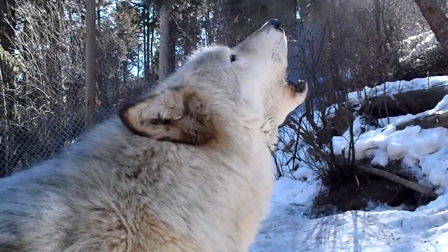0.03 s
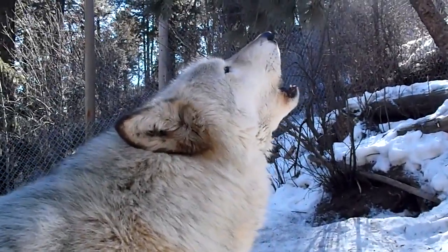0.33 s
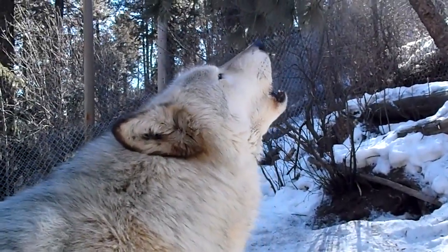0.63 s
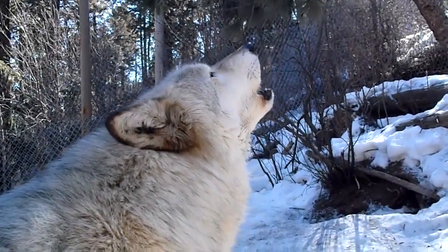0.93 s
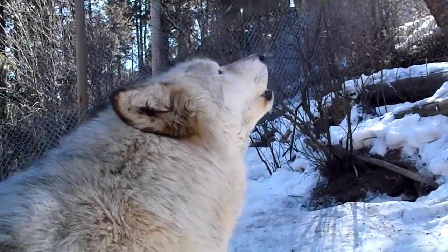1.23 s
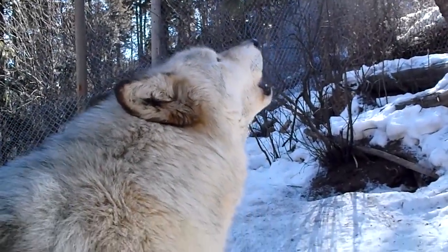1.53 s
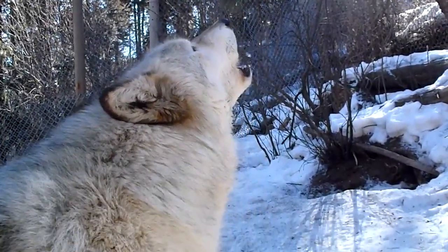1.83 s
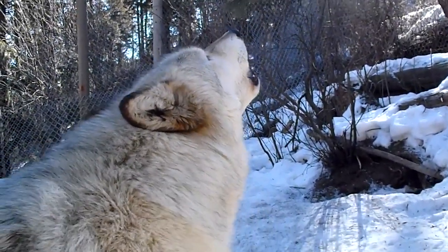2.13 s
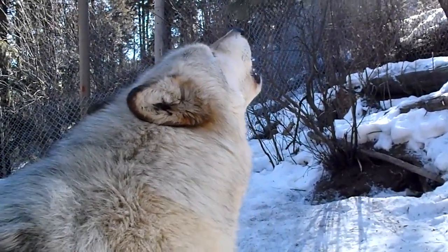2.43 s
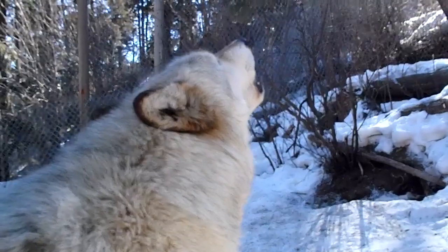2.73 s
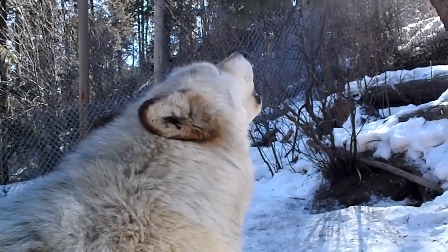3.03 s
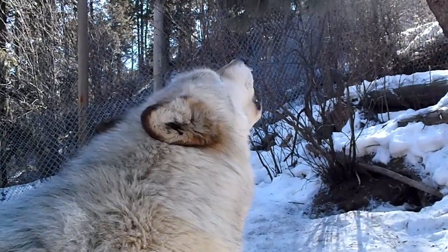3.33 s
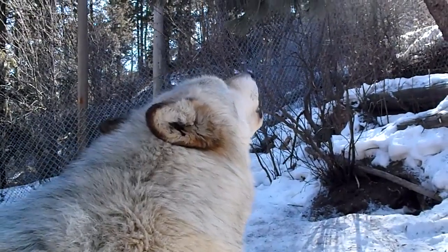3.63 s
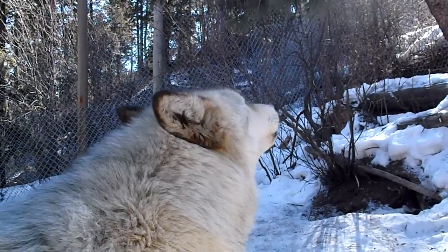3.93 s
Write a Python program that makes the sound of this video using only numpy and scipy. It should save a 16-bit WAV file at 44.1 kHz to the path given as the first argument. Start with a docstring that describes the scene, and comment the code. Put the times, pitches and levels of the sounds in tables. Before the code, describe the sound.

A wolf howls close to the microphone in a quiet wood. Its clear tone sinks, breaks lower, jumps back up and sinks again, briefly hoarse. Other wolves howl faintly far away, and light wind rumbles on the microphone.

```python
"""A wolf howls close by in a snowy wood, while other wolves answer far off and light wind rumbles
on the microphone. Its vocal folds start on a nearly pure tone that slowly sinks. At 1.2 s the voice
breaks down into a low register, with a few small ticks. At 2 s it breaks up again, then sinks as
the jaw closes, turning hoarse in places and ticking once more near the end."""
import sys
import numpy as np
from scipy import signal
from scipy.fft import rfft, irfft
from scipy.io import wavfile

SR = 44100
rng = np.random.default_rng(int(sys.argv[2]) if len(sys.argv) > 2 else 0)


def dump(signal):
    """Clip the signal to [-1, 1] and save it as 16-bit WAV at the path in sys.argv[1]."""
    limited = np.clip(np.atleast_2d(signal).T, -1, 1)
    pcm = np.round(limited * 32767).astype(np.int16)
    wavfile.write(sys.argv[1], SR, pcm)


N = 176400  # 4 seconds

# Small ticks, perhaps of the mouth: start_s, level_db
MOUTH_TICKS = [(1.232,-29),(1.548,-36),(1.571,-49.5),(1.596,-40),(1.616,-40.5),(1.827,-37.5),(3.462,-26)]


def wolf():
    """Vibrating vocal folds make the howl; hoarseness shakes its pitch and adds pulsing breath noise."""
    # The howl's three stretches: time_s, pitch_hz, first_harmonic_db, second_harmonic_db
    opening_tone = [(0.02, 698.6, -24, -22), (0.162, 677, -21, -31), (0.32, 662.5, -19.5, -29.5),
                    (0.486, 648, -18.5, -31), (0.516, 644.5, -21.5, -31.5), (0.53, 642.5, -17.5, -33),
                    (0.565, 626.3, -21.5, -26.5), (0.598, 620.4, -19, -23), (0.72, 591, -26, -19),
                    (0.796, 577.4, -26.5, -19.5), (0.942, 568.2, -28, -18.5), (1.002, 555.4, -32, -22),
                    (1.042, 545.3, -19, -21.5), (1.078, 541.7, -20.5, -27.5), (1.154, 519.5, -21.5, -24.5),
                    (1.184, 508.1, -17.5, -25), (1.208, 490.4, -19.5, -35)]
    low_tone = [(1.223, 443.7, -17, -25), (1.238, 435, -19.5, -29.5), (1.362, 419.6, -19, -28),
                (1.474, 429.3, -19.5, -27.5), (1.548, 482.4, -18.5, -35), (1.59, 497.3, -19.5, -41.5),
                (1.601, 499, -16.5, -42), (1.636, 503.4, -16.5, -42), (1.813, 491, -18, -46),
                (1.91, 487, -17, -40.5), (2.02, 485.6, -17.5, -36.5)]
    closing_tone = [(2.028, 608.4, -28, -27.5), (2.044, 608.5, -24.5, -35.5), (2.104, 604.3, -18.5, -30),
                    (2.158, 609.8, -18, -36.5), (2.39, 606.4, -18.5, -36.5), (2.658, 610.2, -21, -32.5),
                    (2.768, 604.2, -22.5, -22), (2.794, 597, -23.5, -18), (2.862, 570.6, -31, -17),
                    (2.978, 567.2, -33, -17), (3.18, 558, -26, -20.5), (3.219, 578.7, -33.5, -22),
                    (3.24, 573, -25.5, -20), (3.384, 581.2, -25, -28), (3.439, 566.2, -28, -19),
                    (3.466, 548, -22.5, -19), (3.545, 544.6, -23.5, -22.5), (3.626, 519.3, -20, -29),
                    (3.648, 504.7, -16, -38.5), (3.675, 496.5, -19, -40.5), (3.714, 501.5, -20, -29.5),
                    (3.756, 493.4, -24, -31.5), (3.877, 467.3, -24.5, -29), (3.933, 500, -32, -26.5),
                    (3.978, 527.3, -24, -32.5), (4.0, 518.6, -37, -26.5)]
    # Strength of harmonics 3 and 4 (three and four times the pitch): time_s, level_db
    third_levels = [(0,-34.5),(.2,-31.5),(.53,-34),(.73,-53),(.93,-54),(1.05,-42),(1.22,-35),(1.33,-25.5),(1.5,-35.5),(1.65,-53),(2.02,-47.5),(2.12,-35.5),(2.65,-37),(2.87,-54),(3.12,-55),(3.45,-50),(3.7,-36),(4,-51.5)]
    fourth_levels = [(0,-71),(.45,-52.5),(.68,-69.5),(.77,-45),(1.1,-43.5),(1.175,-24),(1.24,-41.5),(1.52,-42),(1.6,-38.5),(2.01,-35.5),(2.05,-56.5),(2.85,-47.5),(3.15,-70),(3.25,-51),(3.42,-54),(3.52,-99),(3.68,-42),(3.81,-54),(3.9,-37.5),(4,-68)]
    # Strength of the hoarse rasp and of air rushing past the folds: time_s, level_db
    rasp_levels = [(0,-46.5),(.48,-49),(.7,-49.5),(.95,-51.5),(1.1,-43),(1.27,-51.5),(1.48,-57.5),(1.55,-49.5),(1.65,-55.5),(2.01,-62),(2.08,-49.5),(2.75,-52),(2.92,-61.5),(3.55,-54.5),(3.7,-44.5),(4,-47)]
    air_levels = [(0,-65.5),(.4,-62.5),(.85,-68),(1.08,-58.5),(1.22,-54.5),(1.27,-82.5),(1.8,-70),(1.94,-62.5),(2.8,-60),(3.1,-62.5),(3.6,-60),(3.8,-59),(4,-56)]
    # Tone colour of the rasp, the rushing air and the rough patches: frequency_hz, gain_db
    rasp_colour = [(150,-43),(350,-19.5),(550,3.5),(800,0.5),(1200,-2.5),(1600,-10),(2100,-5.5),(2750,-19),(3600,-22.5),(4800,-22.5),(6000,-36),(8000,-38),(14000,-51.5)]
    air_colour = [(1500,-8.5),(2200,-2.5),(2800,-21),(3700,4),(4300,-10),(4750,-22),(5900,-12.5),(7500,-19),(14000,-19.5)]
    growl_colour = [(200,-40.5),(450,-19),(600,-6),(760,0),(980,9),(1300,7.5),(1550,-5),(2100,-7.5),(2700,-28),(3700,-26),(6000,-41.5)]
    pitch, first_db, second_db = in_time(opening_tone, low_tone, closing_tone)
    low_gains = from_db([first_db, second_db] + in_time(third_levels) + in_time(fourth_levels))
    rasp, air = from_db(in_time(rasp_levels) + in_time(air_levels))
    rough = roughness()
    pitch_shake = (.001 + .17 * (rasp + rough)) * drift(hz=53)
    phase = 2 * np.pi * np.cumsum(pitch * (1 + pitch_shake)) / SR
    numbers, sines = harmonics(phase, count=14)
    high_gains = overtones(numbers[len(low_gains):] * pitch, strain=(air / air.max()) ** 2)
    tone = np.sqrt(2) * np.sum(np.vstack([low_gains, high_gains]) * sines, axis=0)
    tone *= from_db(.25 * drift(hz=57))  # a slight shimmer in loudness
    grain = from_db(3 * drift(hz=90))
    growl = rough * rms_one(noise(growl_colour) * grain)
    breath = rasp * noise(rasp_colour) + growl + air * noise(air_colour)
    fold_pulses = 1 + .5 * np.cos(phase)
    return tone * (1 + flutter() + swell()) + breath * fold_pulses


def overtones(hz, strain):
    """Gains of the faint high harmonics, which waver and rattle more when the voice strains."""
    # Strength of the high harmonics before the throat shapes them: time_s, level_db
    treble_levels = [(0.0, -72.5), (0.3, -57), (0.55, -56), (0.7, -59), (0.95, -55.5), (1.15, -51),
                     (1.26, -69), (1.6, -63.5), (1.75, -69.5), (2.1, -58.5), (2.25, -60.5), (2.8, -57.5),
                     (3.12, -63), (3.27, -56), (3.8, -68), (4.0, -66.5)]
    treble, = from_db(in_time(treble_levels))
    rattle = 1 + .55 * strain * np.array([drift(hz=130) for _ in hz])
    waver_db = (1.8 + 2.5 * strain) * np.array([drift(hz=12) for _ in hz])
    return treble * throat(hz) * from_db(flares(hz) + waver_db) * rattle


def throat(hz):
    """The throat and muzzle favour some frequencies, and which ones depends on how open the mouth is."""
    # Resonances for three mouth shapes: frequency_hz, narrow_db, half_open_db, wide_db
    resonances = [(2030,14,28,5.5),(2417,15.5,14,29),(2770,-1.5,-12.5,-12.5),(3555,16.5,13,3),(3680,9,7.5,9.5),(3950,24.5,-4.5,-4),(4220,15,-7.5,-5.5),(4750,-5,-14.5,-5.5),(5065,-8,-8,23.5),(5600,13,-15,1),(6100,-6.5,-14.5,-3.5),(6980,-20,-18,-21.5),(8300,-33,-33.5,-31)]
    # The jaw slowly closes: time_s, opening (0 narrow to 1 wide)
    jaw = [(0,0.97),(1.1,0.6),(1.4,0.59),(2.1,0.52),(2.75,0.2),(3.3,0.31),(3.65,0.08),(4,0.2)]
    opening, = in_time(jaw)
    frequencies, *shapes = np.transpose(resonances)
    shares = [np.clip(1 - abs(2 * opening - i), 0, 1) for i in range(len(shapes))]
    return from_db(sum(share * np.interp(hz, frequencies, shape) for share, shape in zip(shares, shapes)))


def flares(hz):
    """Boost in dB of an overtone as it passes through a brief, narrow resonance."""
    # Brief resonances: time_s, frequency_hz, boost_db
    boosts = [(1.08,6000,16),(1.561,2646,17.5),(1.64,5100,16),(1.66,4450,15.5),(3.639,3566,14.5),(3.722,4700,20.5),(0.591,3700,5.5),(3.87,4390,13.5),(3.87,4690,21),(3.93,3900,10),(3.98,2630,13),(3.99,4980,19)]
    t = np.arange(N) / SR
    width_s, width_hz = .045, 224
    return sum(db * bell(t - s, width_s) * bell(hz - centre, width_hz) for s, centre, db in boosts)


def roughness():
    """How rough the voice is at each moment: each rough patch swells and fades."""
    # Rough patches of the voice: peak_s, rise_s, fall_s, level_db
    patches = [(.555,0.026,0.049,-34),(1.22,0.016,0.0082,-36.5),(2.82,0.019,0.015,-45),(3.765,0.024,0.063,-30)]
    t = np.arange(N) / SR
    return sum(from_db(db) * bell(t - s, np.where(t < s, rise, fall)) for s, rise, fall, db in patches)


def flutter():
    """Just after a break, the folds flutter between the two registers and the loudness beats."""
    # Breaks of the voice: start_s, beat_hz, depth (share of the tone)
    breaks = [(1.211,69.2,0.49),(2.022,114,0.58)]
    out, t = 0, np.arange(N) / SR
    fade_s = .018
    for s, hz, depth in breaks:
        age = np.maximum(t - s, 0)
        out = out + depth * np.sin(2 * np.pi * hz * age) * np.exp(-age / fade_s)
    return out


def swell():
    """Before a tick the tone swells, more for a louder tick; at the tick it snaps back."""
    t = np.arange(N) / SR
    boost_db, rise_s = 17.5, .02
    return sum(from_db(db + boost_db) * (t < s) * np.exp(-abs(t - s) / rise_s) for s, db in MOUTH_TICKS)


def mouth_ticks():
    """Tiny dull clicks, each with a low thud and a brief crackle."""
    out, t = np.zeros(N + SR), np.arange(SR // 50) / SR
    click_hz, thud_hz, crackle_s = 1300, 160, .00045
    click = np.exp(-2 * np.pi * click_hz * t)
    thud = .36 * np.exp(-2 * np.pi * thud_hz * t)
    for s, db in MOUTH_TICKS:
        crackle = .13 * rng.standard_normal(len(t)) * np.exp(-t / crackle_s)
        start = int(s * SR)
        out[start:start + len(t)] += from_db(db) * (click + thud + crackle)
    return out[:N]


def far_wolves():
    """Distant, slightly wavering howls that fade in and out; their level wanders on the way."""
    # Each far howl: step_db from one harmonic to the next, then rows of time_s, pitch_hz, level_db
    howls = [ (-11.5, [(.1,385,-69),(.2,394.5,-46.5),(.3,414,-47),(.7,385,-59),(.92,380,-54),(1.1,410,-54),(1.4,400,-65.5),(2.3,393.4,-55.5)]),
             (-13.5, [(2.05,470,-69),(2.2,507.7,-42.5),(2.3,461,-47),(2.42,415,-51),(2.6,378,-54.5),(3.5,380,-52),(3.8,395,-43),(4,407.4,-51)]),
             (-13, [(3.7,620.7,-63),(3.78,651.5,-44),(3.9,650,-70.5),(3.94,579.5,-34),(4,575,-40)]),
             (-22, [(1.97,797,-51.5),(2.2,780,-49)]), (0, [(2.44,475,-64),(2.51,492,-51),(2.57,484,-67)])]
    out, t = np.zeros(N), np.arange(N) / SR
    fade_s, wander_db = .04, 4
    for step_db, rows in howls:
        pitch, db = in_time(rows)
        start_s, end_s = rows[0][0], rows[-1][0]
        fade = np.clip(np.minimum(t - start_s, end_s - t) / fade_s + 1, 0, 1)
        phase = 2 * np.pi * np.cumsum(pitch * (1 + .004 * drift(hz=12))) / SR
        _, sines = harmonics(phase, count=3)
        for k, sine in enumerate(sines):
            out += np.sqrt(2) * fade * from_db(db + step_db * k + wander_db * drift(hz=9)) * sine
    return out


def trees(voices):
    """Trunks and slope scatter the voices back as a faint, dull echo."""
    t = np.arange(N) / SR
    echo_s = .12  # time to fade by 60 dB
    fade = from_db(-60 * t / echo_s)
    dull_noise = signal.sosfilt(signal.butter(1, 2500, fs=SR, output="sos"), rng.standard_normal(N))
    tail = dull_noise * fade / np.sqrt(np.sum(fade ** 2))
    return from_db(-11) * signal.fftconvolve(voices, tail)[:N]


def wind():
    """Light gusts rumble on the microphone, with a few soft bumps of air."""
    # Tone colour of the rumble: frequency_hz, gain_db
    rumble_colour = [(15,5.5),(55,2.5),(90,-5),(160,-14.5),(280,-21),(800,-50)]
    # Soft bumps of air: peak_s, width_s, level_db
    air_bumps = [(0.364,0.048,-41.5),(1.117,0.055,-42),(2.288,0.0067,-36),(2.38,0.018,-48),(2.555,0.091,-44.5),(3.293,0.013,-45),(3.605,0.0097,-35.5)]
    t = np.arange(N) / SR
    bumps = sum(from_db(db) * bell(t - s, width) for s, width, db in air_bumps)
    gusts = from_db(-52 + 2.5 * drift(hz=3.3))
    return (gusts + bumps) * noise(rumble_colour)


def still_air():
    """The quiet, steady hush of the wood."""
    # Tone colour of the hush: frequency_hz, gain_db
    hush_colour = [(20,10.5),(100,-4),(220,-3.5),(450,2.5),(900,-3.5),(1500,-12.5),(3000,-23),(7000,-31),(14000,-35.5)]
    return from_db(-54.5) * noise(hush_colour)


def from_db(db):
    """Turn decibels into a gain, the number to multiply a sound by."""
    return 10 ** (np.asarray(db) / 20)


def rms_one(x):
    """Scale a signal to an average power of 1."""
    return x / np.sqrt(np.mean(x ** 2) + 1e-20)


def bell(distance, width):
    """A smooth hump, 1 high where the distance is zero."""
    return np.exp(-.5 * (distance / width) ** 2)


def in_time(*tables):
    """Join tables end to end and give each column after the time at every sample."""
    s, *columns = np.vstack(tables).T
    return [np.interp(np.arange(N) / SR, s, column) for column in columns]


def noise(colour):
    """Noise of power 1 with the given tone colour."""
    frequencies, db = np.transpose(colour)
    hz = np.arange(N // 2 + 1) * SR / N
    gain = from_db(np.interp(np.log(hz + 1), np.log(frequencies), db))
    return rms_one(irfft(rfft(rng.standard_normal(N)) * gain, N))


def drift(hz):
    """A random wander of typical size 1; a higher hz makes it quicker."""
    smoothing = signal.butter(2, hz, fs=SR, output="sos")
    return rms_one(signal.sosfilt(smoothing, rng.standard_normal(N + SR))[SR:])


def harmonics(phase, count):
    """The numbers 1 to count as a column, and a sine wave at each of those multiples of the pitch."""
    numbers = np.arange(1, count + 1)[:, None]
    return numbers, np.sin(numbers * phase)


def scene():
    """The near wolf and the far pack among the trees, over wind and still air."""
    voices = wolf() + mouth_ticks() + far_wolves()
    return (voices + trees(voices) + wind() + still_air())[None]


def record(dry):
    """The highest treble is cut off steeply."""
    cutoff_hz = 14400
    return signal.sosfilt(signal.ellip(10, .1, 80, cutoff_hz, fs=SR, output="sos"), dry)


dry = scene()
out = record(dry)
dump(out)
```